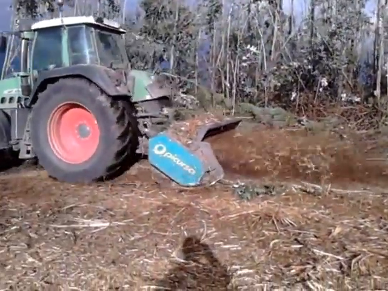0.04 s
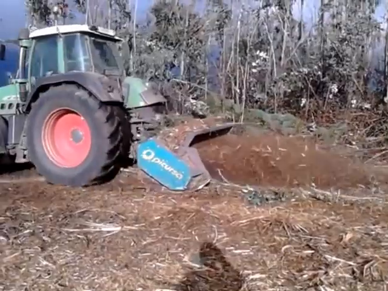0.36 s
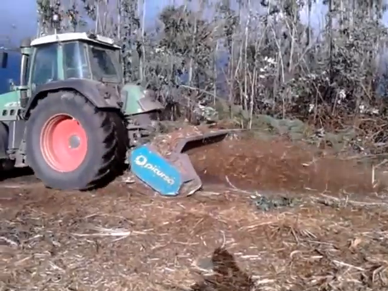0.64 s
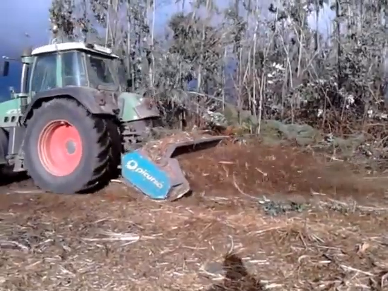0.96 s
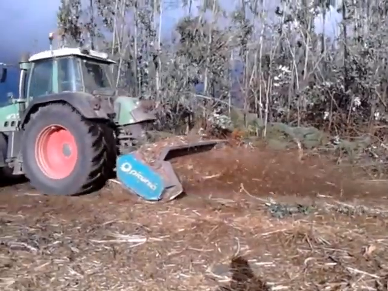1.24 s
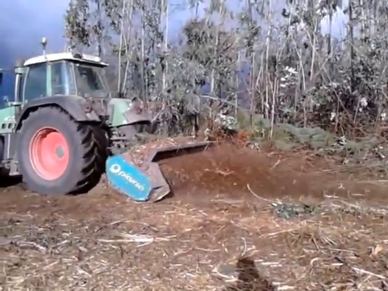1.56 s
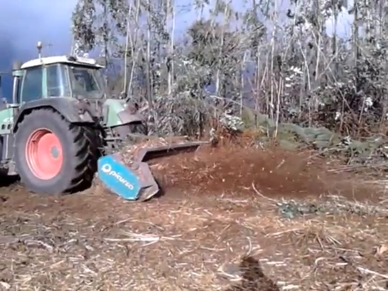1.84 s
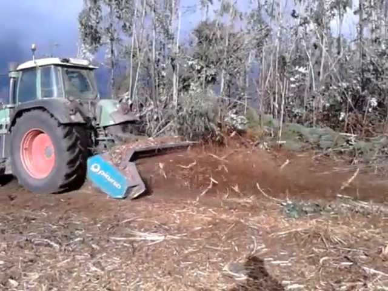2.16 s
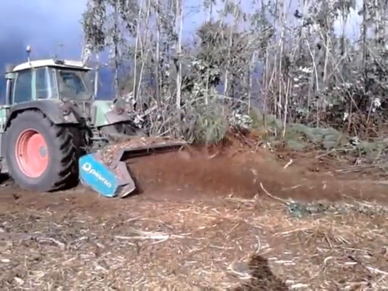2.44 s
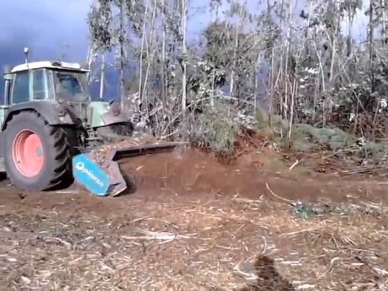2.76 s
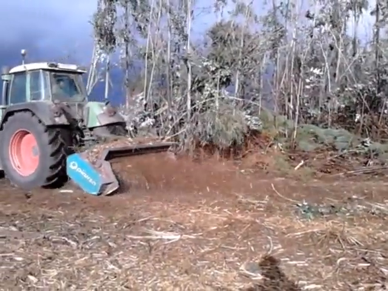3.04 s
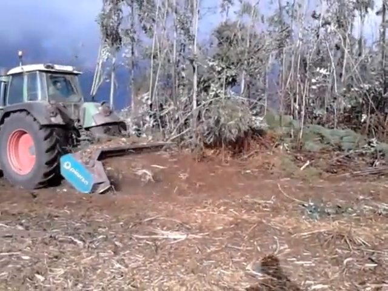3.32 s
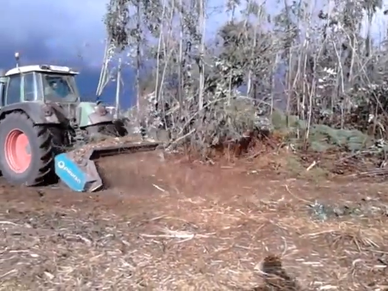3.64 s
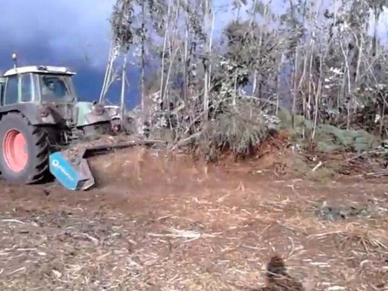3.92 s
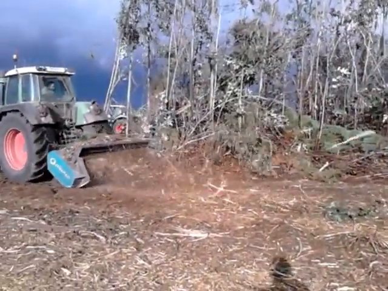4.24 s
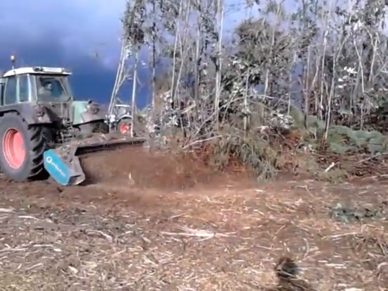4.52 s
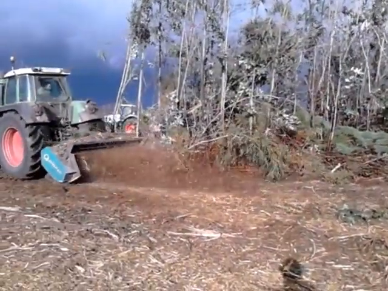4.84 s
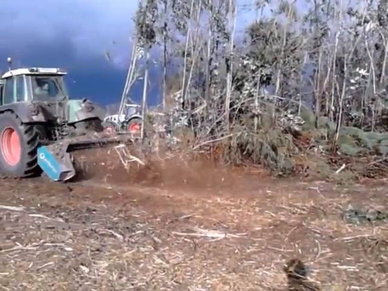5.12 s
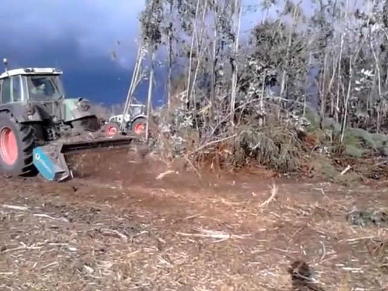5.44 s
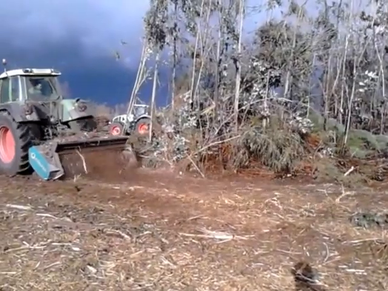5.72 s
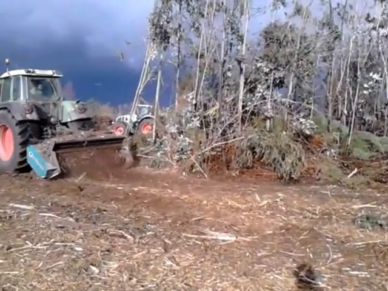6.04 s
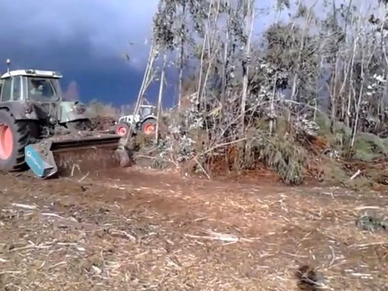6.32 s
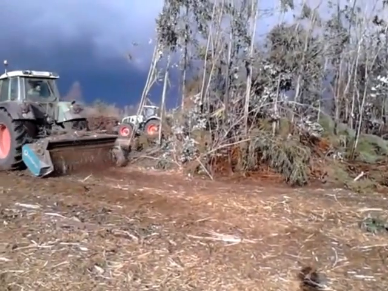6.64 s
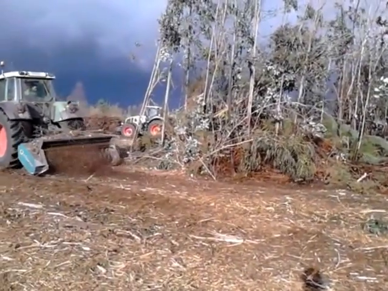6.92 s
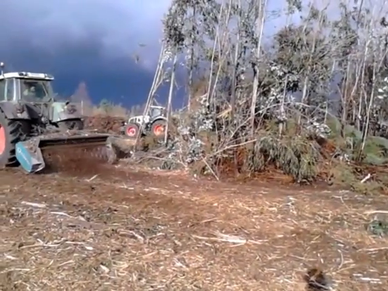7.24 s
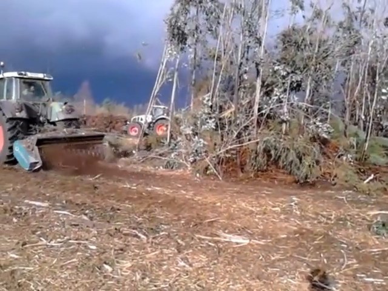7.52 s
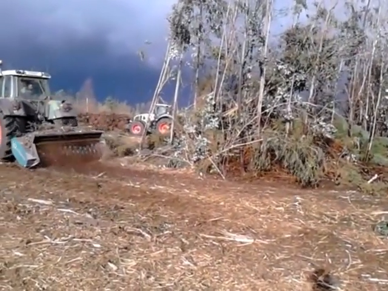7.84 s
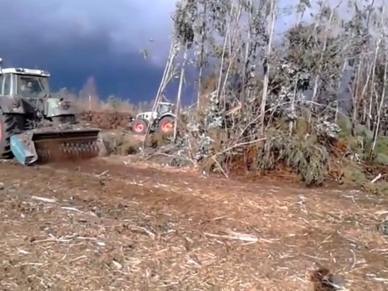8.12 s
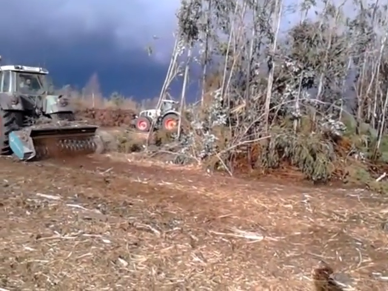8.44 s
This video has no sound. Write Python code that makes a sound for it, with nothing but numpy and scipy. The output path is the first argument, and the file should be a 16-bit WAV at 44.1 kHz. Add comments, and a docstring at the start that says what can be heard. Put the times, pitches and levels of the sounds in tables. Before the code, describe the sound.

From the start, a tractor-driven mulcher grinds wood and soil loudly on open ground, a dense crackling roar with a hiss of flying grit. A diesel engine drones at a low, nearly steady pitch above a rumble. Chips and stones crack irregularly against the steel hood. The grinding surges as branches are caught, at the very start and around 2, 2.6 and 3.4 seconds. From about 3 to 5 seconds the engine and grinding recede as the machine draws away. Further surges with clusters of sharp cracks come at about 5.3 and 6 seconds, then lighter knocks around 7. Wind bumps the mono microphone, faintly early on and more strongly near 5, 6.5 and 8 seconds. At about 7.7 seconds a loud burst of hits coincides with a blunt pop of air. The gritty spray grows a little and continues until the end at 8.6 seconds.

```python
"""Wood grinds and cracks in a ringing steel hood as a tractor drags a forestry mulcher past.
The rotor shreds branches and soil and flings chips and stones against the hood, whose colour
turns as the machine goes from side-on to rear-on and draws away. The diesel drones and the chassis
rumbles below; the ground returns a short echo; gusts buffet and overload a mono microphone."""
import sys
import numpy as np
from scipy import signal
from scipy.fft import rfft, irfft
from scipy.io import wavfile
from scipy.ndimage import uniform_filter1d

SR = 44100
rng = np.random.default_rng(int(sys.argv[2]) if len(sys.argv) > 2 else 0)


def transcribe(signal):
    """Save signal, clipped to [-1, 1], as a 16-bit WAV file at the path in sys.argv[1]."""
    frames = np.atleast_2d(signal).T
    limited = np.clip(frames, -1, 1)
    pcm = np.round(limited * 32767).astype(np.int16)
    wavfile.write(sys.argv[1], SR, pcm)


N = 377937
TIME = np.arange(N) / SR


def mulcher(firings, rise_db, clump_db=0.37, feed_db=0.57, flurry_db=1.0, chips_db=-8):
    """Wood and soil are shredded in uneven clumps and thrown against the hood."""
    # steady cutting through litter as the machine draws away: time_s, grind_db, spray_db
    cutting = [(0, -17.5, -17.5), (1.55, -20, -15.5), (2.5, -22.5, -18.5), (3.35, -22.5, -18),
               (4.05, -25.5, -21.5), (4.65, -29.5, -28.5), (5.15, -31, -29), (6.75, -31, -28.5),
               (7.35, -27.5, -22.5), (8.57, -27, -21.5)]
    # larger stones and billets hitting the hood: start_s, level_db, thud_offset_db
    big_hits = [(.3556, -2, -16), (.4768, -5, -3), (0.62, -5, -3), (1.5079, -3, -24), (2.7675, -1, -4),
                (3.21, -9, 4.5), (3.554, -2, -1.5), (3.569, -2, -4), (3.925, 0.5, -11), (4.299, -7, -10),
                (4.3107, -3.5, -10.5), (4.566, -10.5, -19), (5.3014, -8.5, -25), (5.384, 1, -9.5),
                (5.97, 0, -18), (6.0546, -3.5, -24), (6.0935, -2, -22), (6.1014, -4.5, -27),
                (6.125, -3, -13), (6.138, 2, -24), (6.2251, -5, -22), (6.7827, -9.5, -11),
                (6.8867, -8, -16), (6.9567, -5, -11), (6.9935, -11, -14), (7.0274, -11, -18),
                (7.0494, -8.5, -20), (7.18, -8.5, -18), (7.211, -7.5, -22), (7.3553, -7.5, -5),
                (7.3823, -8, -20), (7.666, 1.5, -11), (7.688, -4, -5), (7.7033, -2.5, 1), (7.7124, 3, -5),
                (7.797, -1, -9.5), (8.0102, -4, -14), (8.088, -2, -20)]
    grind_db, spray_db = curves(cutting) + rise_db
    # The grinding pulses faintly with the engine's firing, over a slight slower throb.
    throb = np.cos(2 * np.pi * firings / 4) + np.cos(2 * np.pi * firings / 2)
    firing_pulse = 1 + 0.081 * np.cos(2 * np.pi * firings) + 0.038 * throb
    load = unit(firing_pulse * undb(clump_db * walk(170) + feed_db * walk(35)))
    wood = load * undb(grind_db - 0.1) * fractures(per_s=3000, spread_db=1.3, hiss=1.34)
    flurries = unit(undb(flurry_db * walk(450)))
    soil = flurries * fractures(per_s=7000, spread_db=2.0, hiss=1.04)
    spray = load * undb(spray_db - 0.96) * (soil + undb(chips_db) * chips())
    thuds, cracks = strikes(big_hits + strays(spray_db))
    return hood(wood + thuds, spray + cracks)


def branches(bite_s=0.077, clear_s=0.15):
    """The rotor grabs a branch, chews and clears; returns the lift of grind and spray in dB."""
    # branches drawn into the rotor: start_s, length_s, grind_rise_db, spray_rise_db
    feed = [(0.057, 0.28, 3, 1), (0.335, 0.1, 4, 1), (0.873, 0.099, 1.5, 0), (1.907, .38, 4.5, 3),
            (2.57, 0.23, 5, 3.5), (2.92, 0.26, 3.5, 3.5), (3.37, 0.21, 6, 5.5), (3.67, 0.19, 4, 3.5),
            (4.73, 0.23, 1.5, 3), (5.26, 0.34, 6, 6.5), (5.72, 0.35, 4, 3.5), (5.991, .39, 7.5, 9.5),
            (7.575, 0.14, 9, 5.5), (7.76, 0.23, 4, 2), (8.15, .18, 3, 3)]
    rise_db = np.zeros((2, N))
    for start_s, length_s, *lift_db in feed:
        attack = (TIME - start_s) / bite_s
        release = 1 - (TIME - start_s - length_s) / clear_s
        grip = np.clip(np.minimum(attack, release), 0, 1)
        rise_db = np.maximum(rise_db, np.outer(lift_db, grip))
    return rise_db


def fractures(per_s, spread_db, hiss):
    """Countless tiny snaps of unequal size over the even hiss of soil."""
    size = undb(spread_db * np.minimum(rng.exponential(size=N), 5))
    snaps = (rng.random(N) < per_s / SR) * size * rng.standard_normal(N)
    return unit(unit(snaps) + hiss * rng.standard_normal(N))


def chips(per_s=900, low_hz=3000, high_hz=14500, ring_s=0.0018, spread_db=2.0):
    """Flying chips and grit, each ticking briefly at a pitch of its own."""
    t = TIME[:SR // 150]
    when, pitch, chance = rng.random((int(per_s * N / SR), 3)).T
    hz = low_hz + (high_hz - low_hz) * pitch
    size = undb(-spread_db * np.log(chance + .01))
    ticks = size[:, None] * np.sin(2 * np.pi * hz[:, None] * t) * np.exp(-t / ring_s)
    places = (when * N).astype(int)[:, None] + np.arange(len(t))
    return unit(np.bincount(places.ravel(), ticks.ravel(), N)[:N])


def strikes(pieces, snap_s=0.0038, rattle_s=0.016, rattle_db=-19, ping_s=0.0034, ping_db=-9):
    """Each piece splinters, pings at its own pitch and rattles off; returns thuds and cracks."""
    thuds, cracks = np.zeros(N), np.zeros(N)
    t = TIME[:SR // 12]
    envelope = np.exp(-(t / snap_s) ** 2) + undb(rattle_db) * np.exp(-t / rattle_s)
    for start_s, level_db, thud_offset_db in pieces:
        body, splinters = np.sign(rng.standard_normal((2, len(t)))) * envelope
        ping_hz = rng.uniform(3200, 7200)
        ping = undb(ping_db) * np.sin(2 * np.pi * ping_hz * t) * np.exp(-t / ping_s)
        add(thuds, start_s, undb(level_db + thud_offset_db - 4.5) * body)
        add(cracks, start_s, undb(level_db - 7) * (splinters + ping))
    return thuds, cracks


def strays(spray_db, per_s=5, lift_db=9, spread_db=1.5, thud_offset_db=-8):
    """Smaller pieces hit at random, riding the level of the spray; returns rows for strikes()."""
    when, chance = rng.random((int(per_s * N / SR), 2)).T
    levels_db = spray_db[(when * N).astype(int)] + lift_db + spread_db * (2 * chance - 1)
    return [(s, db, thud_offset_db) for s, db in zip(when * N / SR, levels_db)]


def hood(blows, spray, split_hz=2800):
    """Heavy blows ring the steel's low resonances, light chips the high; the colour turns with it."""
    # hood resonances: pitch_hz, width_hz, side_db, oblique_db, rear_db
    resonances = [(596, 560, -5.5, -8.5, -16.5), (834, 380, -12.5, -6, -18.5), (1260, 730, -6.5, -4.5, -17),
                  (1556, 630, -6.5, -1.5, -9.5), (1629, 210, -4, -23, -5.5), (1997, 545, 0.5, -2.5, -32),
                  (2225, 600, -23, -6.5, -9), (2630, 350, -7, -18, -33), (2860, 600, -39, -11, -18.5),
                  (3620, 1880, -12.5, -9, -18), (4160, 2400, -9, -25, -29), (5826, 2000, -20, -3.5, -11),
                  (6590, 2780, -6, -9.5, -15), (8210, 3700, -26, -9, -18.5),
                  (9950, 3170, -14.5, -12.5, -21.5), (12370, 6300, -20, -15.5, -24.5)]
    # the machine turning away: time_s, angle (0 side-on, 0.5 oblique, 1 into the open rear)
    turning = [(0, 0), (1.5, .21), (4.4, 0.37), (5.5, 0.78), (7.1, 0.79), (7.8, 0.95), (8.57, 0.8)]
    angle = curves(turning)[0]
    f = np.fft.rfftfreq(2048, 1 / SR)[:, None]
    pitch_hz, width_hz, *angles_db = np.transpose(resonances)
    detuning = (f ** 2 - pitch_hz ** 2) / (f * width_hz + 1)
    peaks = 1 / (1 + detuning ** 2) ** 3
    lows = 1 / (1 + (f[:, 0] / split_hz) ** 8)
    out = 0
    for k, db in enumerate(angles_db):
        power = peaks @ undb(db) ** 2
        crossfade = np.maximum(0, 1 - abs(2 * angle - k))
        out = out + crossfade * (ring(blows, power * lows) + ring(spray, power * (1 - lows)))
    return out


def diesel(firings, tone_db, steady_db=1.3, waver_db=2.0):
    """Six cylinders fire a little unevenly: a firm tone with wavering half and whole multiples."""
    # exhaust partials: multiple of the firing rate, level_db
    exhaust = [(.5, -24), (1, 0.5), (1.5, -18), (2, -16), (2.5, -25.5), (4, -27), (7, -19)]
    out = 0
    for multiple, level_db in exhaust:
        drift_db = steady_db * walk(6.8) if multiple == 1 else waver_db * walk(16)
        partial = np.sin(2 * np.pi * (multiple * firings + rng.random()))
        out = out + undb(level_db + drift_db) * partial
    return np.sqrt(2) * out * undb(tone_db)


def chassis(grind_rise_db, shake_db_per_db=0.41):
    """The chassis rumbles under the steady cut and shakes harder on a branch."""
    # the rumble fading as the machine draws away: time_s, level_db
    fading = [(0, -27.5), (1.1, -29.5), (3.8, -35.5), (6.8, -38.5), (8.57, -35)]
    # bass-heavy colour of the rumble: frequency_hz, gain_db
    rumble_eq = [(20, -30), (45, -13), (70, -3), (100, 2.5), (170, 1), (240, 0.5), (320, -6.5),
                 (450, -10.5), (700, -16), (2000, -60)]
    rumble = unit(colour(rng.standard_normal(N), rumble_eq))
    return rumble * undb(curves(fading)[0] + shake_db_per_db * grind_rise_db)


def ground(x):
    """The ground's echo carves notches that drift upward as the machine draws away."""
    # what the ground returns: frequency_hz, gain_db
    echo_eq = [(400, -10.5), (1100, -14.5), (1900, -19), (2600, -7.5), (3300, -3.5), (4100, -40),
               (6000, -15), (8000, -10), (15000, -41)]
    # the echo follows ever closer with distance: time_s, lag_ms
    echo_lag = [(0, 1.395), (4.6, 1.275), (8.57, 1.115)]
    lag_s = curves(echo_lag)[0] / 1000
    return x + np.interp(TIME - lag_s, TIME, colour(x, echo_eq))


def breeze(calm_db=-47, edge_hz=70):
    """A breeze flutters low on the microphone, swelling smoothly out of a calm."""
    # slow swells: centre_s, level_db, half_length_s
    swells = [(.65, -43, .3), (3.35, -39, .3), (5, -30.5, .25), (6.4, -34, .25), (8.101, -32, .42)]
    strength = undb(calm_db)
    for centre_s, level_db, half_s in swells:
        strength = strength + undb(level_db) * np.exp(-((TIME - centre_s) / half_s) ** 2)
    return unit(lowpass(rng.standard_normal(N), edge_hz)) * strength


def gusts(low_cut_hz=30):
    """Short eddies tumble over the microphone as bassy bumps."""
    # eddies: centre_s, level_db, half_length_s, upper_edge_hz
    eddies = [(.31, -23, 0.081, 170), (.82, -26, 0.037, 170), (3.528, -28, .012, 199),
              (4.654, -17.5, 0.012, 273), (4.905, -12, .012, 347), (4.973, -13, 0.015, 334),
              (6.031, -23, .009, 259), (6.452, -10, 0.0058, 271), (6.531, -22, .007, 240),
              (7.365, -22.5, 0.014, 170), (7.97, -8.5, 0.0093, 340), (7.998, -20, 0.011, 320),
              (8.098, -16.5, .021, 252)]
    out = np.zeros(N)
    t = TIME[:SR // 4] - 1 / 8
    for centre_s, level_db, half_s, edge_hz in eddies:
        envelope = np.hanning(len(t)) / (1 + (t / half_s) ** 2)
        air = lowpass(rng.standard_normal(len(t)), edge_hz, order=4)
        air = air - lowpass(air, low_cut_hz, order=1)
        eddy = unit(air * envelope) * np.sqrt(np.mean(envelope ** 2))
        add(out, centre_s + t[0], undb(level_db) * eddy)
    return out


def air_pop(edge_hz=260):
    """One blunt push of air holds the microphone down for a moment."""
    # the overloading push: start_s, length_s, level_db
    pop = (7.6668, 0.00417, 7.2)
    start_s, length_s, level_db = pop
    push = (TIME > start_s) & (TIME < start_s + length_s)
    return -undb(level_db) * lowpass(1. * push, edge_hz, order=1)


def undb(db):
    """Decibels to gain."""
    return 10 ** (np.asarray(db) / 20)


def unit(x):
    """Scale to rms 1."""
    return x / np.sqrt(np.mean(x ** 2))


def curves(table):
    """The columns of a table, joined by straight lines in time."""
    times_s, *columns = np.transpose(table)
    return [np.interp(TIME, times_s, column) for column in columns]


def walk(rate_hz):
    """Smooth random wandering at rms 1."""
    hold = max(int(SR / rate_hz), 1)
    steps = np.repeat(rng.standard_normal(N // hold + 1), hold)
    return unit(uniform_filter1d(steps, hold)[:N])


def lowpass(x, hz, order=2):
    """Butterworth low-pass."""
    return signal.sosfilt(signal.butter(order, hz, fs=SR, output="sos"), x)


def colour(x, points):
    """Equalise x along points of frequency_hz, gain_db."""
    hz, db = np.transpose(points)
    f = np.maximum(np.fft.rfftfreq(N, 1 / SR), 1)
    return irfft(rfft(x) * undb(np.interp(np.log(f), np.log(hz), db)), N)


def ring(x, power):
    """Pass x through the causal, unit-energy response of a power spectrum."""
    cepstrum = irfft(np.log(power / power.mean() + 1e-9) / 2)
    half = len(cepstrum) // 2
    cepstrum[1:half] *= 2  # minimum phase: the ringing follows the hit
    cepstrum[half + 1:] = 0
    response = irfft(np.exp(rfft(cepstrum)))[:half]
    return signal.oaconvolve(x, response)[:N]


def add(track, start_s, sound):
    """Mix a sound into a track."""
    i = int(start_s * SR)
    track[i:i + len(sound)] += sound[:N - i]


def scene():
    """Mulcher and chassis with their ground echo, diesel and wind, the same in both channels."""
    # the engine under load: time_s, firing_hz, tone_db
    engine = [(0, 116.2, -26.5), (.35, 116.3, -23.5), (.75, 112.8, -29.5), (1.2, 115.8, -26),
              (2.2, 119.5, -27.5), (3.15, 119.3, -29), (3.4, 117.9, -38), (4.2, 118.8, -35.5),
              (5.4, 120.7, -35), (6.1, 120, -36), (7, 119.1, -39), (8.57, 119, -35)]
    firing_hz, tone_db = curves(engine)
    firings = np.cumsum(firing_hz) / SR
    rise_db = branches()
    machine = chassis(rise_db[0]) + mulcher(firings, rise_db)
    mono = ground(machine) + diesel(firings, tone_db) + breeze() + gusts() + air_pop()
    return np.array([mono, mono])


def record(dry, top_hz=15600):
    """Peaks overload at full scale, then a steep filter cuts the top."""
    top_cut = signal.ellip(10, .1, 70, top_hz, fs=SR, output="sos")
    return signal.sosfilt(top_cut, np.clip(dry, -1, 1))


dry = scene()
out = record(dry)
transcribe(out)
```